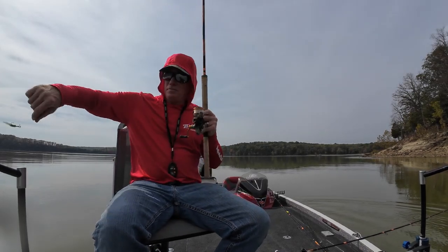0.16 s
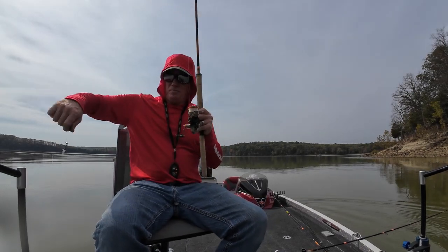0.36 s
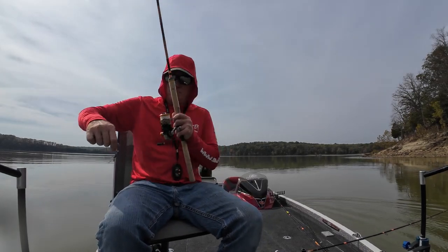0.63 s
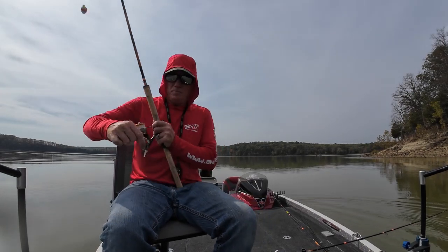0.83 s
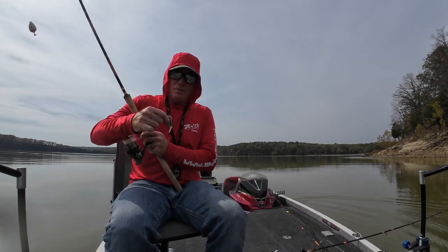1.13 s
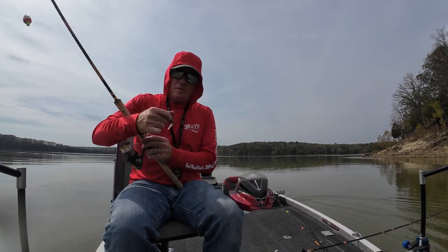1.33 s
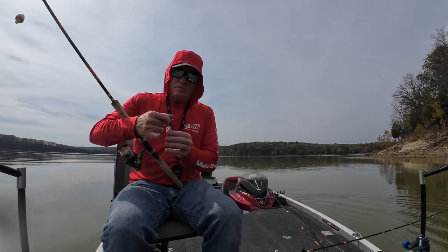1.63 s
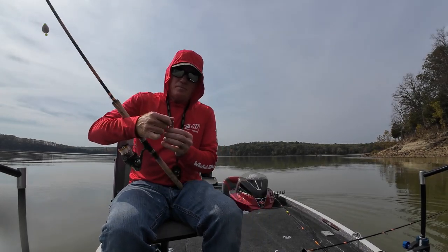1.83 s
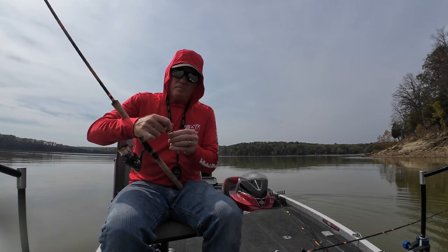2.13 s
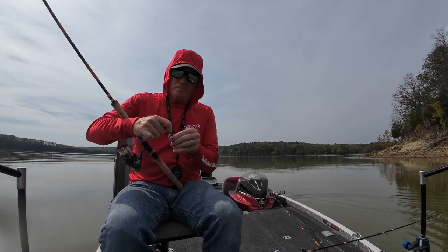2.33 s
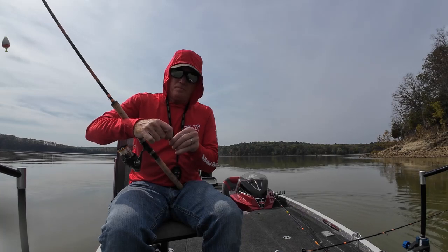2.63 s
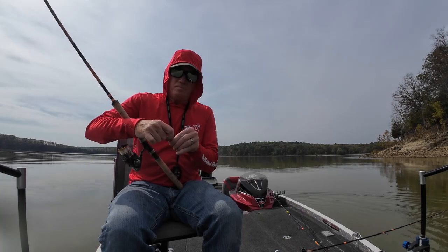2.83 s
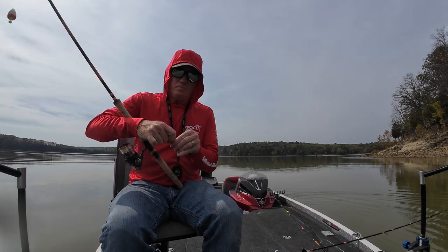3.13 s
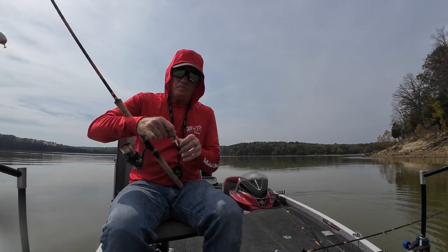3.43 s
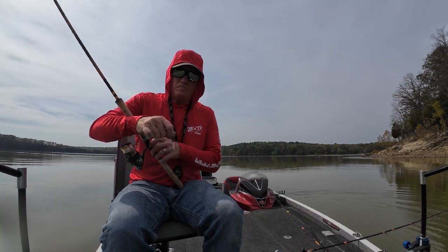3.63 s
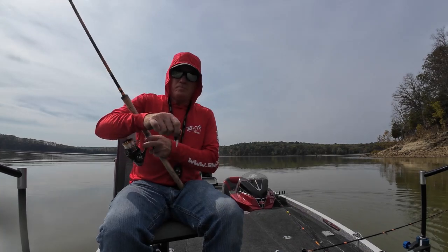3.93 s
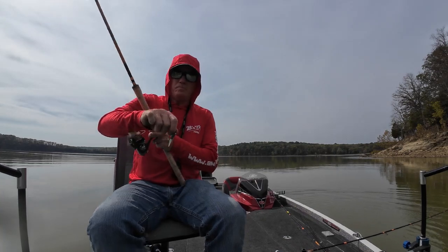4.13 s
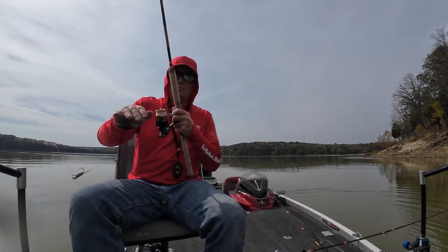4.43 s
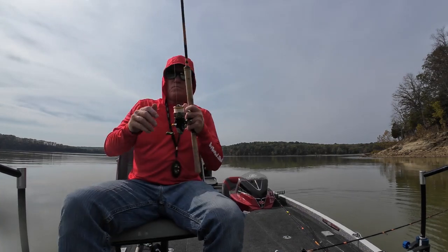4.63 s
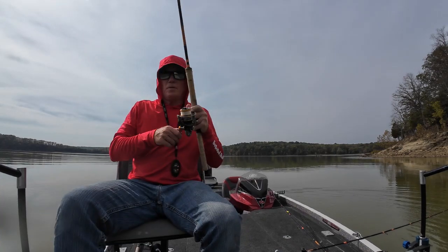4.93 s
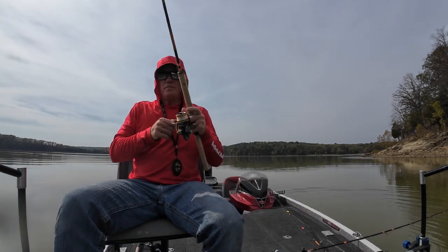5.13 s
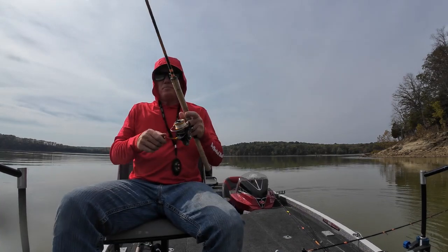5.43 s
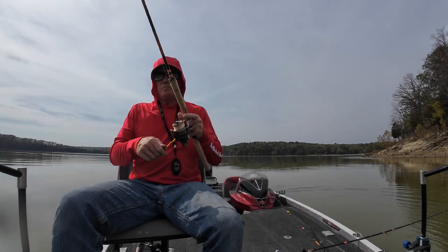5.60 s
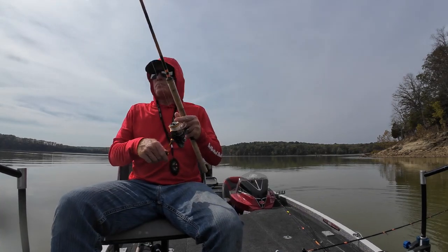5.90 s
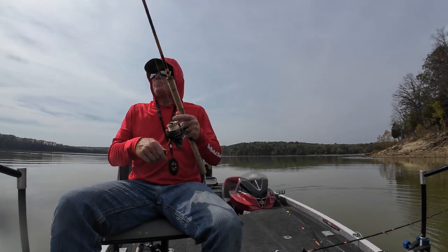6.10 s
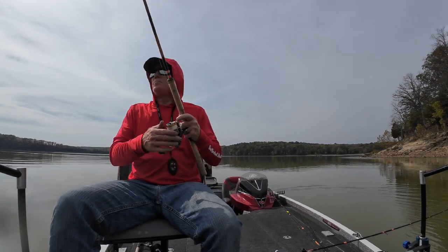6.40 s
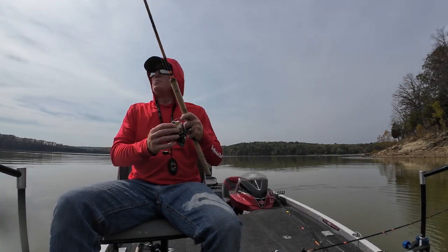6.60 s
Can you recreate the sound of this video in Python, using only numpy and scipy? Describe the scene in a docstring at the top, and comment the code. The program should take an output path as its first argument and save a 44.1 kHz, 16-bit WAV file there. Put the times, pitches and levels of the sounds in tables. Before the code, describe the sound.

Outdoors on a calm lake, a low wavering hum, a faint far drone, breeze rumble and thin air hiss run throughout. Thin squeals around three kilohertz, likely far birds, overlap from 0 to about 3 seconds, some clean and falling, some raspy, with a blurred echo from the shore. At 1.0-1.3 a close reel gives bright metallic clicks with line ticks and sliding; tiny water plops follow near 1.45, and another click at 1.9. A soft deck knock comes at 2.5. Around 3-4 the squeals pause and faint rubbing begins. From 4.1 to 4.7 crisp clicks return with more calls, then a quick, accelerating, fading ratchet at 4.8 and a dull handle knock near 5. Cloth brushes and scrapes around 5.2, clicks at 5.4 and 5.9, squeals until 6.1. Small sharp ticks and a tiny squeak at 6.5-6.7 end it.

```python
"""A spinning reel is handled on a boat on a calm lake: bail and rotor click as cracks of noise and ringing modes.
Line ticks and slides, and sleeves rustle, as bursts and strokes of filtered noise.
Water plops at the hull as short rising tones. Thin, mostly falling squeals, most likely far birds,
are gliding tones that overlap, partly rasp, and echo along the wooded shore.
Underneath lie a low hum and a thin drone, a breeze with gusts and faint open air, all from noise."""
import sys
import numpy as np
from scipy import signal
from scipy.fft import rfft, irfft
from scipy.io import wavfile
from scipy.ndimage import uniform_filter1d, map_coordinates

SR = 44100
rng = np.random.default_rng(int(sys.argv[2]) if len(sys.argv) > 2 else 0)


def wav_record(signal):
    """Record a signal, one row per channel, as 16-bit PCM in the file named by sys.argv[1]."""
    frames = np.transpose(np.atleast_2d(signal))
    bounded = np.clip(frames, -1, 1)
    # unit amplitude maps onto the largest positive 16-bit level
    quanta = np.round(bounded * 32767).astype(np.int16)
    wavfile.write(sys.argv[1], SR, quanta)


N = 297957
T = np.arange(N) / SR  # time in seconds

# In all tables, t60_s is the time a sound takes to fade by 60 dB.
# Single clicks of the reel, before the trims in reel(): start_s, level_db, lows_db, treble_db
CLICKS = [(0.0204, -57.5, -9.5, -18), (1.1006, -37, -18.5, -8), (1.2223, -44, -20, -10),
          (1.9321, -37.5, -16.5, -9.5), (2.0389, -47.5, -19.5, -14.5), (3.7394, -53.5, 1, -2.5),
          (4.1262, -38, -18.5, -8.5), (4.2146, -51, -24, -14), (4.3069, -47, -17.5, -11),
          (4.5119, -39, -17, -5), (4.6086, -55.5, -12, -10), (4.7272, -39.5, -11.5, -3.5),
          (4.9713, -43.5, -12.5, -11), (5.3676, -42, -7, -1), (5.915, -41, -8.5, -3.5),
          (5.9762, -60, 2, -12), (6.2448, -74, -9, -11)]
# Ringing tones of the reel body: pitch_hz, level_db, t60 as a multiple of CLICK_T60_S
REEL_MODES = [(226, -14.5, 3.5), (390, -20.5, 1.1), (763, -20, 1.9), (1134, -31, 3.8), (1650, -18, 2.1),
              (2020, -17.5, 2), (2214, -16, 3.5), (2733, -1.5, 0.98), (3345, -11, 2.2), (3840, -3.5, 1.5),
              (4060, 2, 0.66), (4930, -11, 1.35), (5267, 0, 0.39), (5556, -1, 0.29), (6120, -5, 0.6),
              (6180, -29, 4.2), (6640, -19.5, 1.94), (7920, -19.5, 1.11), (8740, -11, 0.62),
              (9790, 0, 0.23), (10420, 3.5, 0.21), (11100, 3, 0.16), (12650, 6, 0.17)]
# Tone colour of the metal crack: pitch_hz, gain_db
CRACK_COLOUR = [(200, -5), (600, -2), (1300, -12), (2500, 5), (4000, 8), (5600, -4), (7400, -10.5),
                (10500, -10), (13000, -10), (15500, -15)]
CLICK_T60_S = 0.048


def reel(gain_db=3, crack_db=1, scatter_db=3.5, low_db=4.5, body_db=-3, treble_db=7,
         rebound_db=-11, rebound_s=0.0027):
    """Each click is a crack of chattering metal plus the ring of the reel body, different at every contact."""
    out, t = np.zeros((2, N)), T[:SR // 5]
    lead = SR // 100  # 10 ms of silence ahead of the click, for the filter
    for start, db, lows, treble in [*CLICKS, *ratchet()]:
        body = 0
        for hz, mode_db, hold in REEL_MODES:
            level = undb(mode_db + scatter_db * rng.standard_normal())
            detuned_hz = hz * (1 + 0.0069 * rng.standard_normal())
            body = body + level * ring(t, detuned_hz, CLICK_T60_S * hold)
        crack = unit(colour(noise(-13, size=len(t)), CRACK_COLOUR)) * fade(t, CLICK_T60_S)
        contact = 1 - np.exp(-t / .0006)
        click = (body + undb(crack_db) * crack) * contact
        # the part bounces once before it settles
        late = int(rebound_s * rng.uniform(.5, 1.8) * SR)
        click = click + undb(rebound_db) * np.pad(click, ((0, 0), (late, 0)))[:, :len(t)]
        # where the blow lands decides how much body and how much treble ring
        blow = [(1200, body_db), (2200, lows + low_db), (4000, lows + low_db),
                (5200, 0), (6800, 0), (10000, treble + treble_db)]
        click = colour(np.pad(click, ((0, 0), (lead, 0))), blow)
        # the level is set by the loudest millisecond
        loudest = np.sqrt(uniform_filter1d(np.mean(click ** 2, axis=0), SR // 1000).max())
        add(out, start - 1 / 100, click / loudest * undb(db + gain_db))
    return out


RATCHET_S, RATCHET_GAP_S, RATCHET_GAP_RATIO = 4.7713, .033, .88  # start, first gap, each gap against the last
# First tooth of the ratchet: level_db, lows_db, treble_db
RATCHET_FIRST = (-48.5, -9, -7)
# Change from tooth to tooth: level_db, lows_db, treble_db
RATCHET_STEP = (-2.3, 1.4, -.9)


def ratchet(count=6):
    """The pawl skips over the teeth ever faster, each click weaker and duller: rows like those of CLICKS."""
    tooth = np.arange(count)
    gaps = RATCHET_GAP_S * RATCHET_GAP_RATIO ** tooth
    starts = RATCHET_S + np.cumsum(gaps) - gaps
    return np.column_stack([starts, np.array(RATCHET_FIRST) + np.outer(tooth, RATCHET_STEP)])


# Dull knocks of the reel handle: start_s, level_db (halved in handle_knocks)
HANDLE_KNOCKS = [(4.975, -38), (5.037, -49), (5.057, -52), (5.84, -55), (6.245, -60)]
# Ringing tones of the handle: pitch_hz, level_db, t60_s
HANDLE_MODES = [(2130, -5, 0.055), (2305, 5.5, 0.024), (2530, 1, 0.07), (2880, 4.5, .02), (3420, 4, 0.026),
                (4180, 1, 0.051), (4480, -7, .025), (5570, -21, 0.014)]


def handle_knocks():
    """The reel handle knocks and rings in a few short tones, slightly detuned each time."""
    out, t = np.zeros((2, N)), T[:SR // 5]
    for start, db in HANDLE_KNOCKS:
        knock = 0
        for hz, mode_db, t60 in HANDLE_MODES:
            detuned_hz = hz * (1 + 0.011 * rng.standard_normal())
            knock = knock + undb(mode_db) * ring(t, detuned_hz, t60)
        add(out, start, undb(db) * knock / 2)
    return out


# Small squeaks of the reel handle: start_s, length_s, start_hz, end_hz, level_db
SQUEAKS = [(2.036, 0.04, 6850, 7300, -77), (3.663, 0.059, 6340, 7560, -72.5), (5.045, .05, 6600, 7180, -75),
           (6.615, 0.068, 6600, 7700, -69)]


def squeaks():
    """The handle squeaks in brief, shaky tones that slide upward."""
    return glides(SQUEAKS, unsteady=0.044)


# Dry ticks of line on the rod guides: start_s, level_db, pitch_hz, snap_db (noise against the tone)
TICKS = [(1.0404, -43.5, 11800, -3.5), (1.168, -42, 11800, -15), (1.215, -50, 11600, 0),
         (3.7394, -59, 2600, 2), (1.541, -59, 3700, -1), (3.9167, -56.5, 2380, -10), (4.239, -61, 10500, 1),
         (4.582, -43.5, 9400, -14), (5.015, -58, 10400, -5), (6.536, -44, 12300, -14),
         (6.5376, -35, 6600, -13), (6.608, -42.5, 6340, -4)]


def ticks(t60=0.01, snap_t60=0.0087, tail_db=-17, tail_t60=0.12):
    """Line flicks against the rod: a snap, one very short ring and a faint shiver of the rod."""
    out, t = np.zeros((2, N)), T[:SR // 20]
    snap_colour = [(1200, -9), (2300, 5), (12000, 6), (15500, -6)]
    for start, db, hz, snap_db in TICKS:
        snap = unit(colour(noise(-27, size=len(t)), snap_colour))
        snap *= fade(t, snap_t60) + undb(tail_db) * fade(t, tail_t60)
        add(out, start, undb(db) * (ring(t, hz, t60) + undb(snap_db) * snap))
    return out


# Line slides through the fingers: start_s, length_s, level_db
RUB = [(.88, 0.21, -75), (1.05, 0.18, -64.5), (1.15, 0.19, -62), (1.33, 0.18, -66), (1.415, 0.1, -58),
       (3.72, 0.087, -68.5), (3.95, 0.44, -70), (4.32, 0.12, -64.5), (4.42, 0.32, -75), (4.74, 0.27, -74.5),
       (4.97, 0.16, -68), (5.08, 0.15, -71.5), (5.23, 0.064, -67)]
# Tone colour of the sliding line: pitch_hz, gain_db
RUB_COLOUR = [(500, 3.5), (4000, 0.5), (6000, -1.5), (7500, -1.5), (10000, 3.5), (13000, 1), (15500, -10)]


def line_rub():
    """Line sliding through the fingers: strokes of uneven noise."""
    return rustle(RUB, RUB_COLOUR)


# Sleeves brush the jacket: start_s, length_s, level_db
SLEEVE = [(.88, 0.11, -68), (1.06, 0.29, -71), (4.05, 0.94, -73), (5.14, 0.43, -65.5)]
# Tone colour of the cloth: pitch_hz, gain_db
SLEEVE_COLOUR = [(300, 6), (1300, -23), (2200, 5), (3400, -2), (4600, -2), (7000, -29), (15000, -43)]


def sleeves():
    """Cloth brushing cloth: strokes of uneven noise, duller than the line."""
    return rustle(SLEEVE, SLEEVE_COLOUR)


def rustle(moves, points, catch_db=-10, bounce=0.46, bounce_s=0.000616, drift=0.19):
    """Something slides in tiny uneven slips and catches; a bounce off the moving hands shifts its colour."""
    slips = undb(2.6 * walk(1500) + 2.2 * walk(45))
    # about 160 catches a second, of random strength
    catches = (rng.random(N) < 160 / SR) * undb(4 * np.minimum(rng.standard_exponential(N), 4))
    grain = unit(noise(-14) * slips) + undb(catch_db) * unit(catches)
    # the bounce is a copy with a wandering delay
    earlier = (T - bounce_s * np.exp(drift * walk(9))) * SR
    bounced = np.array([map_coordinates(side, [earlier], mode="mirror") for side in grain])
    return unit(colour(grain + bounce * bounced, points)) * strokes(moves)


STROKE_ATTACK_SHARE, STROKE_CURVE = 0.23, 0.84  # loudest point as a share of a stroke, and power of its shape


def strokes(rows):
    """Gain of a series of strokes that each swell quickly, then ease off."""
    power = np.zeros(N)
    for start, length, db in rows:
        speed = np.interp((T - start) / length, [0, STROKE_ATTACK_SHARE, 1], [0, 1, 0])
        power += (undb(db) * np.sin(np.pi / 2 * speed) ** STROKE_CURVE) ** 2
    return np.sqrt(power)


# Scrapes that catch and sing: start_s, length_s, start_hz, end_hz, width_hz, level_db
SCRAPES = [(1.117, 0.045, 6800, 7050, 700, -78), (1.408, 0.072, 9160, 10300, 1500, -64),
           (4.01, 0.19, 12400, 13100, 990, -77), (5.04, 0.17, 12000, 13200, 2170, -72),
           (5.211, 0.085, 2950, 2680, 203, -67), (5.219, 0.11, 4750, 4620, 305, -73),
           (5.29, 0.084, 2000, 2254, 304, -66.5)]


def scrapes(slip_db=3):
    """Line and cloth drag in quick slips through a narrow resonance that slides in pitch."""
    out = np.zeros((2, N))
    for start, length, start_hz, end_hz, width_hz, db in SCRAPES:
        n = int(length * SR)
        turn = np.exp(2j * np.pi * np.cumsum(np.linspace(start_hz, end_hz, n)) / SR)
        # a randomly wandering size and phase widens the tone into a band
        wander = walk(width_hz)[:n] + 1j * walk(width_hz)[:n]
        slips = undb(slip_db * walk(114)[:n])
        scrape = unit(np.real(wander * turn) * slips)
        add(out, start, scrape * undb(db) * np.sqrt(np.hanning(n)))
    return out


# The two microphone ports hear near sounds differently: pitch_hz, left_minus_right_db
PORT_BALANCE = [(2400, 0), (4400, 1), (8500, -3), (12500, 0.5)]


def ports(x, lag_s=.000019):
    """Near sounds reach the left port a moment sooner, and each port colours them in its own way."""
    f = np.fft.rfftfreq(N, 1 / SR)
    half = np.array([[1], [-1]]) / 2  # half of each difference goes to either side
    balance = undb(half * np.interp(f, *np.transpose(PORT_BALANCE)))
    shift = np.exp(2j * np.pi * half * f * lag_s)
    return irfft(rfft(x) * balance * shift, N)


# Water at the hull: start_s, level_db (doubled in plops), pitch_hz, t60_s
PLOPS = [(1.4425, -35, 516, 0.025), (1.4435, -44.5, 713, 0.019), (1.455, -43.5, 434, 0.049),
         (1.444, -42, 2820, 0.014), (1.529, -43, 2670, 0.017), (1.538, -37, 2720, 0.03),
         (1.582, -56, 2740, 0.031), (2.763, -43.5, 1008, 0.02), (3.916, -49.5, 910, 0.01),
         (4.238, -57, 512, 0.057), (4.256, -52.5, 2650, 0.02), (4.271, -57, 2650, .02),
         (5.839, -60.5, 746, 0.041), (6.331, -69, 468, 0.22)]


def plops(splash_db=-20, splash_t60=0.14, rise=0.2):
    """Small pockets of air ring under the hull, rising a little, each with a faint splash of noise."""
    out, t = np.zeros((2, N)), T[:SR // 5]
    onset = 1 - np.exp(-t / 0.00052)
    for start, db, hz, t60 in PLOPS:
        bubble = ring(t, hz * (1 + rise * t), t60)
        splash_colour = [(hz / 2, -18), (hz, 0), (hz * 2, -22), (hz * 5, -40)]
        splash = unit(colour(noise(-12, size=len(t)), splash_colour)) * fade(t, splash_t60)
        add(out, start, 2.0 * undb(db) * (bubble + undb(splash_db) * splash) * onset)
    return out


# Ringing tones of the deck: pitch_hz, level_db, t60_s
DECK_MODES = [(416, -8, 0.11), (784, -8.5, 0.13), (1153, -5.5, 0.1), (1300, -31, .04), (2300, -1, 0.083),
              (2780, -6.5, 0.04), (3570, -11, 0.07)]
KNOCK_S, KNOCK_DB = 2.469, -41  # start, and level before it is halved


def deck_knock():
    """Something knocks once on the deck, which rings in a few short tones."""
    out, t = np.zeros((2, N)), T[:SR // 5]
    knock = sum(undb(db) * ring(t, hz, t60) for hz, db, t60 in DECK_MODES)
    add(out, KNOCK_S, undb(KNOCK_DB) * knock / 2)
    return out


# The hull booms softly as the boat rocks: start_s, length_s, pitch_hz, level_db
BOOMS = [(2.217, 0.1, 90, -45), (2.45, 0.1, 129, -46.5), (2.933, 0.12, 103.2, -48.5),
         (4.758, 0.18, 128.6, -49), (4.828, 0.11, 96.6, -44.5), (4.96, .2, 116.2, -47),
         (5.56, 0.095, 126.6, -48.5)]


def booms():
    """Slow dull swells of the rocking hull: low, very unsteady tones."""
    return glides([(start, length, hz, hz, db) for start, length, hz, db in BOOMS], unsteady=0.19)


# Overlapping squeals: start_s, length_s, start_hz, crest_hz, end_hz, crest as a share of the length,
# level_db, rasp from 0 to 1, loudest point as a share of the length
SQUEALS = [(-.06, 0.23, 3130, 3145, 3040, 0.12, -56, 0.28, 1),
           (0.204, 0.094, 3390, 3364, 3220, 0.12, -66, 0, 0.44),
           (.29, .17, 3256, 3270, 3230, .25, -64.5, .1, 0.75),
           (0.551, 0.066, 3150, 3226, 3160, 0.71, -59.5, 0.16, 0.6),
           (0.626, .105, 3320, 3340, 3255, 0.18, -70.5, 0, 0.45),
           (0.716, 0.15, 3265, 3237, 3054, 0.061, -57, 0.05, 0.37),
           (.85, .12, 3065, 3057, 3010, .1, -64.5, 0.1, 0.27),
           (1.02, 0.32, 3327, 3230, 3140, .31, -69.5, 0.1, 0.7),
           (1.37, 0.19, 3160, 3185, 3213, 0.35, -59.5, 0.2, 0.61),
           (1.543, 0.15, 3110, 3116, 2996, 0.15, -54, 0.43, 0.21),
           (1.688, 0.086, 3030, 3038, 3100, .8, -62, 0.2, 0.48),
           (1.815, 0.25, 3395, 3400, 3165, 0.24, -60.5, 0, 0.21),
           (2.04, 0.19, 3037, 3165, 3127, 0.46, -54, 0.24, .45),
           (2.22, 0.1, 3180, 3136, 2973, 0.059, -55, .5, .3),
           (2.32, 0.14, 3080, 3054, 3010, .2, -65, 0.9, .3),
           (2.753, .125, 3000, 3170, 3020, 0.42, -59, 0.2, 0.13),
           (2.865, 0.191, 3050, 3110, 3048, 0.48, -58, 0.95, 0.27),
           (4.117, 0.3, 3400, 3405, 3174, 0.22, -66, .1, 0.83),
           (4.397, 0.31, 3158, 3225, 2925, .1, -54, 0, 0.45),
           (4.885, 0.28, 3455, 3500, 2910, 0.15, -62, 0.02, 0.23),
           (5.334, 0.28, 3040, 3096, 2990, 0.15, -53, 0, 0.54),
           (5.613, 0.11, 3020, 3070, 3060, .7, -62, 0.6, 0.29),
           (5.69, 0.092, 3350, 3320, 3250, 0.091, -62.5, 0.14, 0.63),
           (5.775, 0.14, 3384, 3350, 3166, .08, -59.5, 0.4, 0.53),
           (5.865, 0.2, 3215, 3175, 2974, .06, -58, .5, 0.23)]
# Tones that make up a call: multiple of its pitch, level_db
PARTIALS = [(.5, -26.5), (.75, -27.5), (1, -2), (1.251, -28.5)]
# How the rasp grows through a call: share of the length, share of the full rasp
CALL_RASP = [(0, 0), (.3, .05), (.55, .9), (1, 1)]
BUZZ_HZ, BUZZ_RISE_HZ = 93.5, 51.4  # second vibration at the start of a call, and its rise to the end
CALL_WAVER, CALL_FLUTTER_DB = .0038, 1.7  # unsteadiness: share of the pitch, and of the level
CALL_ONSET_S, CALL_RELEASE_S = 0.0066, 0.018
RASP_RELEASE_S = 0.05  # added to the release at full rasp
CALL_START_DB, CALL_END_DB = -5, -3  # level at either end of a call, against its loudest point
TREMBLE, RASP_TREMBLE = .18, .55  # loudness tremble in a clean call, and extra at full rasp


def squeals(fall=1.15, rasp_depth=0.5):
    """Each call is a whistle bending through a crest pitch; a slower second vibration makes some rasp."""
    clean, raspy = np.zeros(N), np.zeros(N)
    waver, flutter, stagger = walk(130), walk(60), walk(18)
    for start, length, start_hz, crest_hz, end_hz, crest, db, rasp, loudest in SQUEALS:
        on = (T > start) & (T < start + length)
        u = (T[on] - start) / length  # share of the call gone by
        crest = np.clip(crest, .05, .9)
        before = np.clip(1 - u / crest, 0, 1)
        after = np.clip((u - crest) / (1 - crest), 0, 1)
        hz = crest_hz + (start_hz - crest_hz) * before ** 2 + (end_hz - crest_hz) * after ** fall
        hz *= 1 + CALL_WAVER * waver[on]
        # the second vibration shakes the pitch of a rasping call
        rough = np.clip(rasp * np.interp(u, *np.transpose(CALL_RASP)), 0, 1)
        buzz_hz = (BUZZ_HZ + BUZZ_RISE_HZ * u) * (1 + 0.084 * stagger[on])
        buzz = 2 * np.pi * np.cumsum(buzz_hz) / SR
        phase = 2 * np.pi * np.cumsum(hz) / SR + rasp_depth * rough * np.sin(buzz)
        # loudness: onset and release, then a swell to the loudest point
        release_s = CALL_RELEASE_S + rasp * RASP_RELEASE_S
        gate = np.clip(np.minimum(u * length / CALL_ONSET_S, (1 - u) * length / release_s), 0, 1)
        swell_db = np.interp(u, [0, np.clip(loudest, .1, .9), 1], [CALL_START_DB, 0, CALL_END_DB])
        level = undb(db + CALL_FLUTTER_DB * flutter[on]) * gate * undb(swell_db)
        tone = sum(undb(part_db) * np.sin(k * phase) for k, part_db in PARTIALS)
        call = level * np.sqrt(2) * tone
        # the second vibration also makes the loudness tremble
        call *= 1 + (TREMBLE + RASP_TREMBLE * rough) * np.cos(buzz)
        clean[on] += call * (1 - rough / 2)
        raspy[on] += call * rough
    return clean + hoarse(raspy, -6)


HOARSE_RATE = 600  # random steps per second


def hoarse(x, db):
    """Fast random flutter that spreads a tone into a narrow band of noise."""
    flutter = walk(HOARSE_RATE) + 1j * walk(HOARSE_RATE)
    return np.real(signal.hilbert(x) * flutter) * undb(db) / np.sqrt(2)


# Thin strands above and below the squeals, before strand_db: start_s, length_s, start_hz, end_hz, level_db
STRANDS = [(.03, 0.15, 2980, 2740, -69), (.04, .09, 2345, 2320, -73), (.43, 0.086, 3090, 2940, -69.5),
           (.57, .13, 1632, 1674, -78), (1.65, .1, 3596, 3510, -69.5), (1.6, 0.18, 3050, 2654, -63),
           (2.06, 0.1, 3110, 3080, -58.5), (2.15, 0.1, 2400, 2350, -76), (2.21, 0.18, 3700, 3570, -68.5),
           (2.23, .2, 2780, 2670, -64), (2.24, .27, 1900, 1650, -78.5), (4.4, 0.094, 2480, 2370, -72),
           (4.49, 0.19, 3300, 3090, -65), (4.58, .17, 2960, 2740, -67), (5.37, .16, 3310, 3180, -73),
           (5.47, 0.13, 3225, 3160, -59.5), (5.55, .17, 3470, 3392, -68.5), (5.54, .13, 2840, 2785, -62),
           (5.59, 0.12, 2800, 2600, -64), (5.64, 0.14, 2920, 2750, -67), (5.79, 0.18, 3240, 2980, -62),
           (5.56, 0.3, 1744, 1603, -76)]


def strands(strand_db=-2):
    """Thin tones that glide along beside the squeals with a fluttering level."""
    return undb(strand_db) * glides(STRANDS, unsteady=0.0096) * undb(1.6 * walk(70))


# Separate echoes from the shore: delay_s, level_db
SHORE = [(0.064, -12.5), (0.108, -24.5), (0.189, -22.5)]
SHORE_T60_S, SHORE_DB = 1.34, -7.5  # decay and level of the scattered echo
SHORE_BUILD_S = 0.026  # the echoes gather slowly


def shore_echo(calls):
    """The wooded shore returns the calls as a few echoes within a gathering, fading wash, roughened."""
    t = T[:3 * SR // 2]
    shore = noise(-2.4, size=len(t)) * fade(t, SHORE_T60_S) * (1 - np.exp(-t / SHORE_BUILD_S))
    shore *= undb(SHORE_DB) / np.sqrt(np.sum(shore[0] ** 2))
    for delay, db in SHORE:
        shore[:, int(delay * SR)] += undb(db)
    return signal.fftconvolve(calls + hoarse(calls, -4.5), shore, axes=1)[:, :N]


# Resonances of the low hum: pitch_hz, width_hz, relative level_db
HUM = [(82.7, 6, -9.5), (97.8, 6.3, -2), (126.2, 12.6, -3.5), (159.2, 30, -11), (469, 14, -42),
       (570, 460, -40)]
HUM_DB, HUM_SWELL_DB, HUM_SWELL_PER_S = -51, 1.17, 8.1


def low_hum(pan_db=-1.5):
    """Noise in a few low resonances, wavering in level and a little stronger on the right."""
    hum = unit(sum(undb(db) * resonance(hz, width) for hz, width, db in HUM))
    side_db = np.array([[pan_db], [-pan_db]]) / 2
    return hum * undb(HUM_DB + HUM_SWELL_DB * walk(HUM_SWELL_PER_S) + side_db)


# Level strokes that make the narrow-band drone noise waver: start_s, length_s, level_db
DRONE_STROKES = [(.05, .3, -70.5), (1.15, 0.3, -72), (2.35, 0.36, -69.5), (4.65, 0.28, -67.5),
                 (5.15, 0.48, -69.5), (6.5, 0.54, -69.5)]
DRONE_HZ, DRONE_WIDTH_HZ, DRONE_DB = 312.2, 3.6, -77.5


def drone():
    """A faint far drone: noise in one very narrow resonance, its level wavering."""
    return np.hypot(undb(DRONE_DB), strokes(DRONE_STROKES)) * resonance(DRONE_HZ, DRONE_WIDTH_HZ)


# Gusts over the steady breeze: start_s, length_s, level_db
GUSTS = [(.27, 0.25, -48), (3.98, 0.51, -54), (4.8, 0.21, -45)]
# Tone colour of the breeze: pitch_hz, gain_db
BREEZE_COLOUR = [(12, -14), (25, 5.5), (50, 3.5), (75, 1), (150, -12.5), (300, -23), (700, -57.5)]
BREEZE_DB = -53


def breeze():
    """The breeze rumbles as very low noise that swells with each gust."""
    return unit(colour(noise(-6.5), BREEZE_COLOUR)) * np.hypot(undb(BREEZE_DB), strokes(GUSTS))


# Tone colour of the open air: pitch_hz, gain_db
AIR_COLOUR = [(100, -4.5), (200, -14), (260, -6), (400, -10), (630, -14.5), (1000, -17), (2000, -20.5),
              (4300, -23.5), (6300, -31), (7400, -35), (8000, -28.5), (8600, -34), (13000, -36),
              (16000, -47)]
AIR_DB = -67.5


def open_air():
    """The faint hiss of open air: filtered noise with a slightly wandering level."""
    return unit(colour(noise(-3), AIR_COLOUR)) * undb(AIR_DB + .5 * walk(3.34))


def undb(db):
    """Decibels to gain."""
    return 10 ** (np.asarray(db) / 20)


def unit(x):
    """Scale to rms 1."""
    return x / np.sqrt(np.mean(x ** 2))


def colour(x, points):
    """Filter by (Hz, dB) points on a log-frequency axis."""
    hz, db = np.transpose(points)
    f = np.maximum(np.fft.rfftfreq(x.shape[-1], 1 / SR), 1)
    gain = undb(np.interp(np.log(f), np.log(hz), db))
    return irfft(rfft(x) * gain, x.shape[-1])


def resonance(hz, width_hz):
    """Noise at rms 1 through one resonance."""
    f = np.fft.rfftfreq(N, 1 / SR)
    return unit(irfft(rfft(noise(-14.5)) / (1 + ((f - hz) / width_hz) ** 2), N))


def noise(side_db, size=N):
    """Two channels of noise, shared but for a side part."""
    mid, side = rng.standard_normal((2, size))
    return mid + undb(side_db) * side * np.array([[1], [-1]])


def walk(rate):
    """Smooth random wander with about `rate` steps a second, spread near 1."""
    k = max(int(SR / rate), 1)
    steps = np.repeat(rng.standard_normal(N // k + 1), k)
    return 1.54 * uniform_filter1d(steps, k)[:N]


def fade(t, t60):
    """Exponential decay, down 60 dB after t60 seconds."""
    return np.exp(-np.log(1000) * t / t60)


def ring(t, hz, t60):
    """One decaying tone from a random point in its cycle."""
    return np.sin(2 * np.pi * (hz * t + rng.random())) * fade(t, t60)


def glides(rows, unsteady):
    """Thin unsteady tones that swell, slide from one pitch to another and fade."""
    out = np.zeros((2, N))
    for start, length, start_hz, end_hz, db in rows:
        n = int(length * SR)
        hz = np.linspace(start_hz, end_hz, n) * (1 + unsteady * walk(1500)[:n])
        tone = np.sin(2 * np.pi * np.cumsum(hz) / SR)
        add(out, start, np.sqrt(2 * np.hanning(n)) * undb(db) * tone)
    return out


def add(out, start, sound):
    """Mix a sound in at a time in seconds."""
    i = max(int(start * SR), 0)
    out[:, i:i + sound.shape[-1]] += sound[..., :N - i]


def scene():
    """Everything heard from the bow."""
    tackle = reel() + handle_knocks() + squeaks() + ticks()
    handling = line_rub() + sleeves() + scrapes()
    boat = plops() + deck_knock() + booms()
    calls = squeals() + strands()
    background = low_hum() + drone() + breeze() + open_air()
    return ports(tackle + handling) + boat + calls + shore_echo(calls) + background


TOP_HZ = 15900


def record(dry):
    """A steep filter cuts the treble above TOP_HZ."""
    return signal.sosfilt(signal.ellip(8, .2, 70, TOP_HZ, fs=SR, output="sos"), dry)


dry = scene()
out = record(dry)
wav_record(out)
```